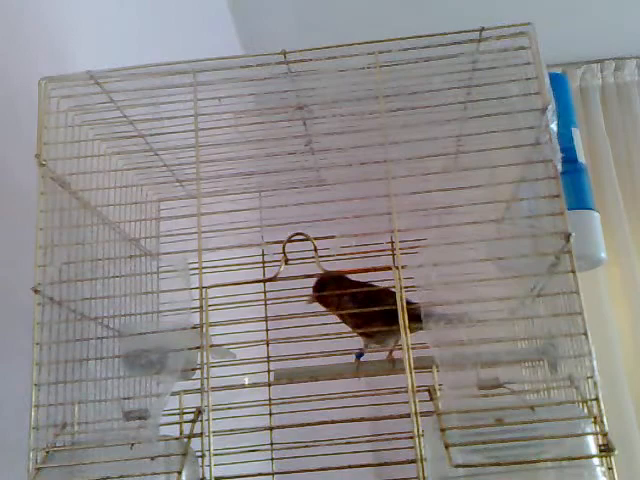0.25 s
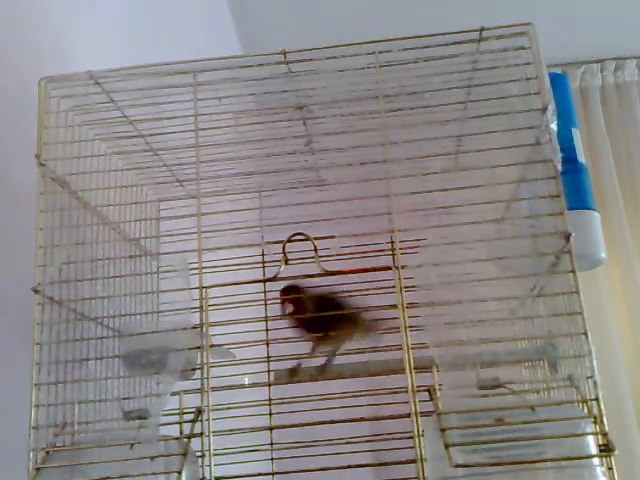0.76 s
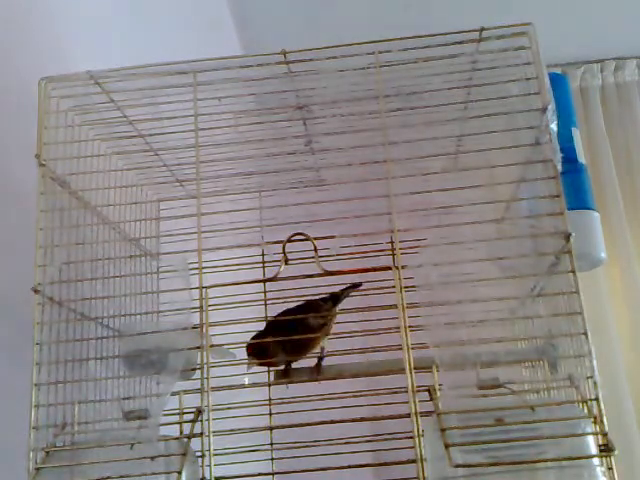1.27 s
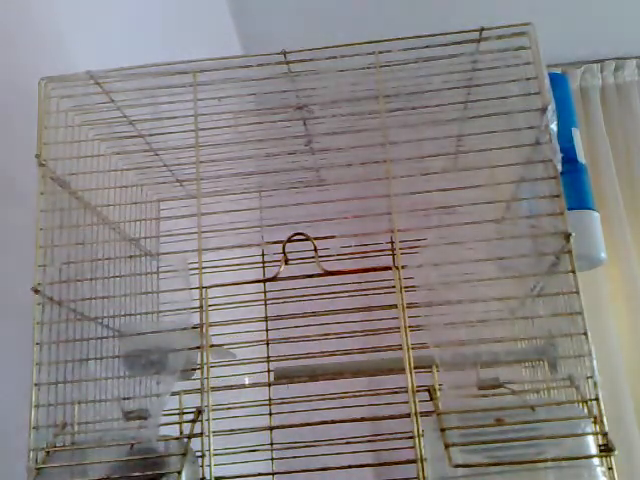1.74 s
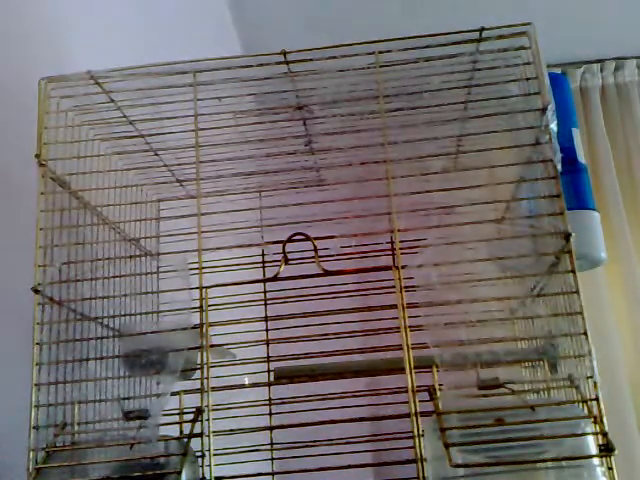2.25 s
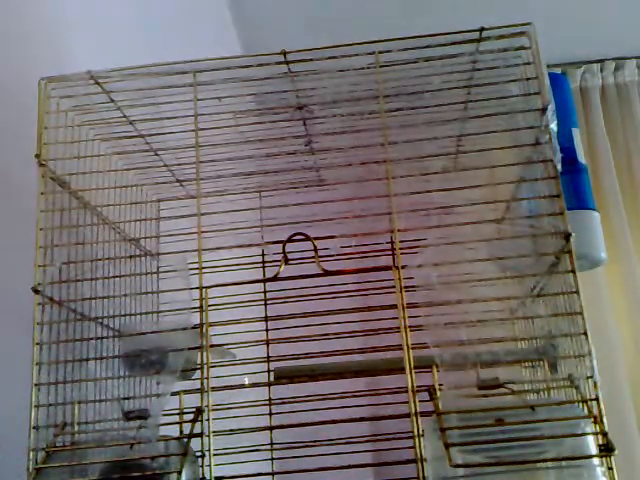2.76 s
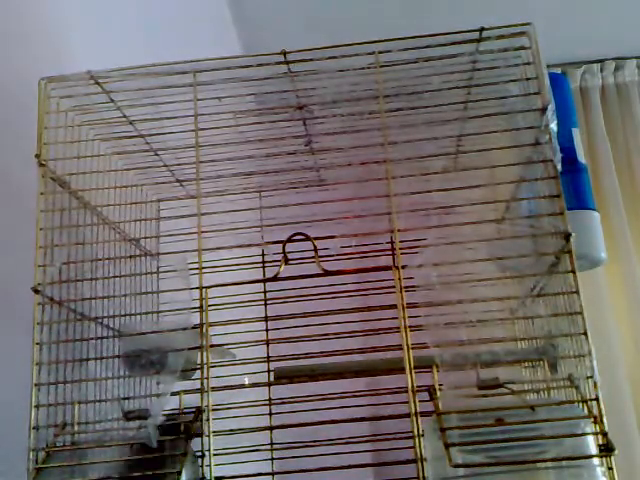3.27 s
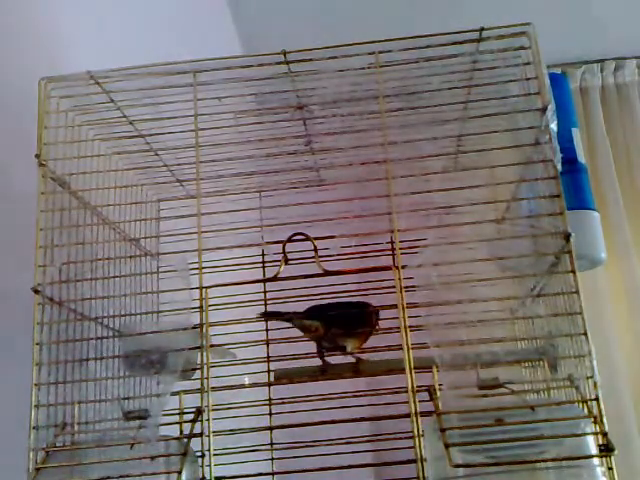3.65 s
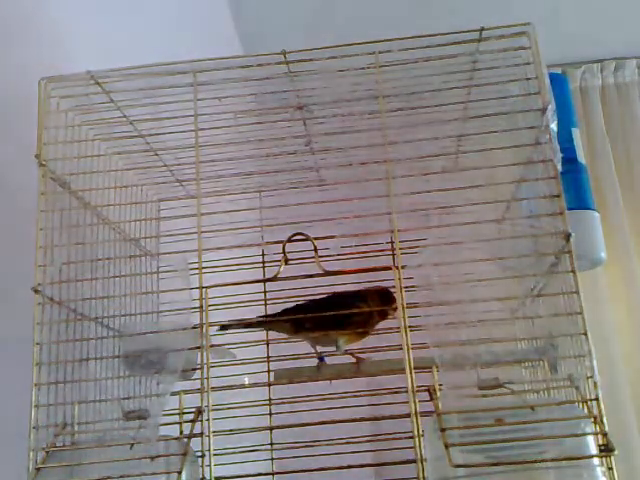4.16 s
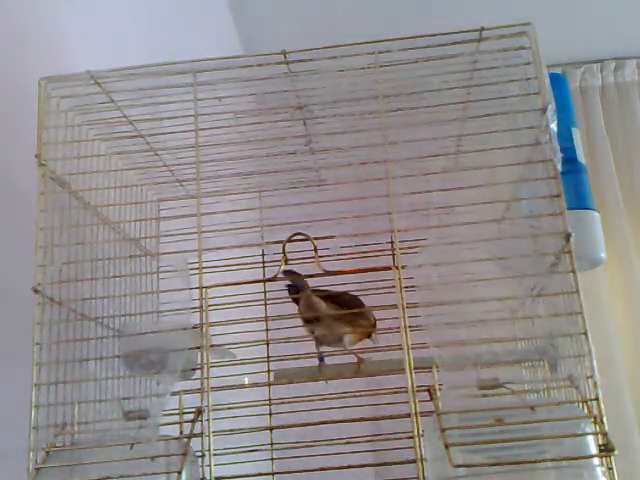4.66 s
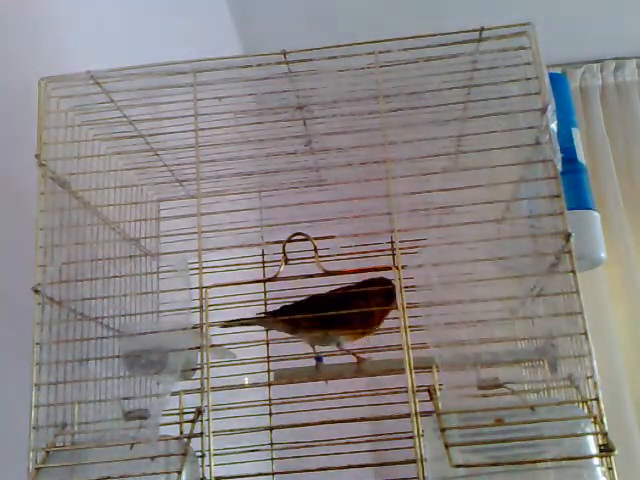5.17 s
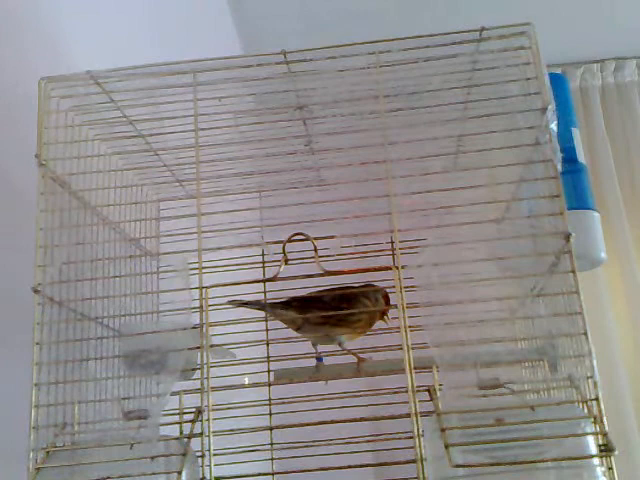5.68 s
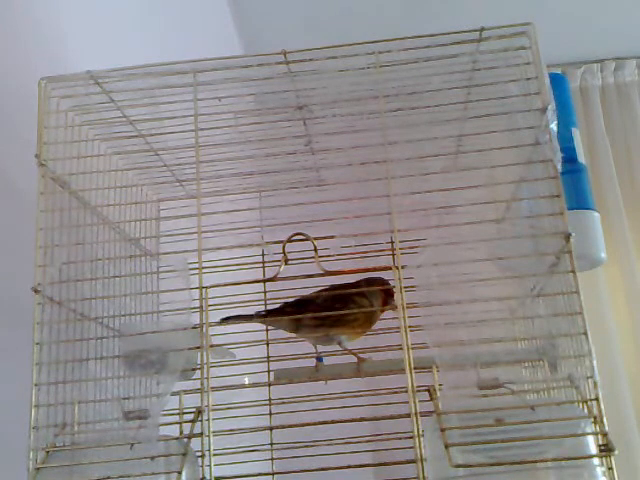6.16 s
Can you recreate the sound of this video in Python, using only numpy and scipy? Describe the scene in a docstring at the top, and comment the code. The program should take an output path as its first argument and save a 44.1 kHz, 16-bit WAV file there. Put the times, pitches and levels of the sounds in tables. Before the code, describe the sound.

The faint echo of an earlier bird phrase dies away at the very start. At about 0.1 s a finch gives a harsh, buzzing chirp that rises quickly, snaps into piercing whistles around 0.17-0.3 s and slides downward by 0.35 s, with a slight overload crackle. Quiet follows over low house rumble and thin hiss. Faint taps come at 0.85-0.9 s, with a soft thud. At 1.63 s a hard double landing clacks on the tray, which rocks briefly to rest. Light claw ticks follow at 2.1-2.2 s and 2.6-2.9 s, then brighter wire rattles at 3.3 s and taps to 3.6 s. Muffled thuds bump between 3.6 and 4.8 s. At 5.35 s a second phrase comes: breathy rasp, quick high whistles, and a falling glide ending near 5.6 s. One tiny peck sounds at 6.2 s. The room is small, with short reflections.

```python
"""A caged finch sings two short phrases: a rising rasp of two beating membranes, then near-sine whistles from
both sides of its syrinx, with sharp clicks at the loudest notes. Between and after them, clicks strike damped
modes of the tray and wires as it hops and pecks; low thuds come through the stand. A small quiet room answers
with decaying noise, over shaped-noise rumble. A small microphone adds hiss, slow gain control and distortion; a
treble noise follows loudness."""
import sys
import numpy as np
from scipy import signal
from scipy.fft import rfft, irfft, next_fast_len
from scipy.io import wavfile
from scipy.ndimage import uniform_filter1d

SR = 44100
rng = np.random.default_rng(int(sys.argv[2]) if len(sys.argv) > 2 else 0)


def master(y):
    """Save y as 16-bit WAV."""
    cut = np.clip(np.atleast_2d(y).T, -1, 1)
    pcm = np.round(cut * 32767)  # scale
    wavfile.write(sys.argv[1], SR, pcm.astype(np.int16))


def magnitude_from_level(level_db):
    """Linear magnitude for a level in decibels (20 dB per decade)."""
    exponent = np.asarray(level_db, float) / 20
    return 10 ** exponent


N = 283058

# Rasps. Each row: start in seconds, middle of the pitch rise in seconds, width of the rise in seconds, loudest
# moment in seconds, peak in dB, swell in dB per second, fade in seconds, beat of the second membrane in Hz.
RASPS = [(.074, .118, .011, 0.15, -10.5, 300.5, .012, 688.8),
         (5.345, 5.365, .013, 5.398, -15.5, 170, 0.074, 628)]
# Throat and beak, one list per rasp. Each row: frequency in Hz, gain in dB.
THROAT_GAINS = [
    [(530, -73.5), (900, -44), (1330, -28.5), (1550, -27), (2000, -28.5), (2750, -23), (3030, -11.5),
     (3740, -7), (4060, -10.5), (5140, -5.5), (6980, -21.5), (7670, -26.5), (15000, -28.5)],
    [(530, -78), (900, -51), (1420, -22), (1570, -19.5), (1890, -26.5), (2030, -22), (3700, -9),
     (4210, -13), (5650, -4.5), (6430, -14.5), (6980, -2), (8530, -23), (15000, -28)],
]
# Harmonics 1-7, one row per rasp: strengths in dB.
HARMONICS_DB = [(1.5, 4, -0.5, -5, -7, -12.5, -13.5), (4, 5.2, 4, 5, -7.5, -10, -16.5)]
# Roughness, one row per rasp: pitch jitter as a share, breath against tone as a ratio.
HOARSENESS = [(.011, .5), (.019, .9)]
RASP_LOW_HZ, RASP_HIGH_HZ = 1247, 1905   # the fundamental rises in an S between these
RASP_ATTACK_S, SILENT_DB = 0.012, -51.5

# Held notes. Each row: start in seconds, length in seconds, entry pitch in Hz, held pitch in Hz before sag,
# first level in dB, last level in dB.
HELD_NOTES = [(0.165, .013, 5600, 6540, -15.5, -21), (.178, .009, 6500, 6200, -24, -19),
              (.177, .011, 3000, 3150, -32, -32), (.1865, .0175, 7800, 5220, -7, -2.5),
              (.205, 0.034, 5200, 5200, -17, -29), (.226, .03, 5600, 5740, -22, -33),
              (.26, .038, 5750, 5780, -19, -21), (5.4385, .006, 5500, 5150, -14, -14),
              (5.458, .006, 5400, 5100, -20, -19), (5.449, .015, 3600, 3640, -20, -21)]
SETTLE_S, SAG_PER_S = 0.0012, 0.6   # time constant of the entry; share of pitch lost per second
EDGE_S, EDGE_DB = 0.0034, 28.5   # soft ends
# Falling glides. Each row: start in seconds, length in seconds, top in Hz, bottom in Hz, bend (1 = straight),
# pitch where it swells in Hz, level in dB.
GLIDES = [(0.226, .12, 5200, 2150, 1.25, 4270, -13), (5.485, .098, 5257, 2200, .92, 4350, -11)]
# Loudness along a glide's fall. Each row: pitch in Hz, level in dB.
GLIDE_STRENGTH = [(2150, -38), (2550, -20), (2950, -7), (3400, 0), (4100, -3), (5000, -5), (5300, -18)]
HUSH_DB, SWELL_WIDTH_HZ = 15, 60   # a glide is softer before its swell
# Two notes slurred together. Each row: time in seconds, pitch in Hz, level in dB.
SLUR = [(5.464, 6890, -35), (5.475, 6800, -17), (5.483, 6776, -14), (5.49, 6640, -36.5), (5.5, 6158, -31.5),
        (5.508, 5920, -10), (5.526, 5836, -13), (5.537, 5800, -50)]
# Sharp clicks at and during loud whistles. Each row: time in seconds, level in dB.
ONSET_CLICKS = [(.1915, -8.5), (.197, -18), (5.512, -24), (5.524, -24), (5.54, -20)]
OCTAVE_DB = -35

# Claw landings. Each row: time in seconds, tray level in dB, wires level in dB.
HOPS = [(0.917, -52, -64), (1.633, -23, -42.5), (1.65, -30.5, -51), (2.081, -49, -64),
        (2.104, -47.5, -73.5), (2.157, -38.5, -59), (2.182, -50, -65), (2.688, -55.5, -61.5),
        (2.919, -62.5, -63.5), (3.275, -37.5, -38.5), (3.286, -47.5, -38), (3.399, -52, -63),
        (3.441, -37.5, -51.5), (3.459, -40.5, -53.5), (3.579, -48, -64.5)]
# Single pecks at a wire. Each row: time in seconds, tray level in dB, wires level in dB, tick level in dB.
PECKS = [(0.841, -67.5, -52, -72), (2.606, -54, -65, -43), (2.869, -44.5, -51.5, -59),
         (3.936, -59, -55.5, -63.5), (6.189, -64.5, -58, -70)]
# Tray modes. Each row: frequency in Hz, level in dB, T60 in seconds.
TRAY_MODES = [(424, -11, 0.022), (612.5, -9, 0.024), (744, -1, 0.025), (873, -4, 0.028), (1049, -1.5, 0.03),
              (1230, 0, 0.027), (1630, -15.5, 0.033), (1930, -19, 0.0096)]
# Wire modes. Each row: frequency in Hz, level in dB, T60 in seconds.
WIRE_MODES = [(2300, 6.5, 0.006), (2940, -8, 0.019), (3227, -6, 0.0087), (3960, -5.5, 0.012),
              (3980, -17, 0.0035), (4820, -2.5, 0.011), (5200, -1, 0.0078)]
FLURRY_S, PECK_S, FLURRY_SWELL = 0.012, 0.0033, 2.4   # click spans; build-up against the fade
CLAW_DB, CLAW_FOLLOWS = -64, 0.52   # claw tick, and how far it follows the wires
# After the hardest landing the tray rocks to rest.
ROCK_S, ROCK_GAP_S, ROCK_DB, ROCK_LOSS_DB, ROCK_WIRES_DB = 1.709, 0.041, -44.5, 4, -24
# Dull thuds through the stand. Each row: time in seconds, push level in dB, mode in Hz.
THUDS = [(0.914, -43.5, 241), (1.252, -45, 233), (1.627, -41, 181), (3.621, -45.5, 222), (3.944, -46, 237),
         (4.419, -36, 214), (4.551, -37.5, 251), (4.784, -49, 235)]

# Earlier phrase dying away. Single row: low edge in Hz, high edge in Hz, level in dB, T60 in seconds.
FADING_BAND = (3400, 6200, -31, 0.17)
LAST_NOTE_HZ, LAST_NOTE_DB = 5600, 1.5   # where the dying phrase is strongest
ROOM_T60_S, TREBLE_T60_S, ROOM_DB = 0.15, 0.085, -4.5
# House rumble. Each row: time in seconds, mean level in dB.
RUMBLE_LEVEL = [(0.0, -51.5), (1.3, -50), (4.11, -51.5), (4.83, -48), (5.13, -52), (6.4, -50), (6.42, -52)]
# Rumble spectrum. Each row: frequency in Hz, density in dB per Hz.
RUMBLE_SPECTRUM = [(13, -39.5), (22, -12.5), (35, -3), (54, 4), (64, -2.5), (75, -13), (102, -3),
                   (140, -10), (233, -14), (360, -22), (700, -31), (910, -58), (1540, -120)]
# Microphone hiss spectrum. Each row: frequency in Hz, density in dB per Hz.
HISS_SPECTRUM = [(240, -31), (400, -6), (527, -8.5), (569, -6), (654, -9.5), (786, -7), (1010, -10.5),
                 (1190, -11), (2230, -14), (2410, -12.5), (6440, -20.5), (7750, -15.5), (8900, -16.5),
                 (15000, -13), (15700, -12)]
HISS_DB = -60
MIXING, TOP = 0.14, 0.8   # microphone: square-law share, amplitude ceiling


def rms_one(x):
    """Scale to rms 1."""
    return x / np.sqrt(np.mean(x ** 2) + 1e-20)


def coloured(x, spectrum):
    """Filter x by dB lines straight in log frequency: cut below the first point, last gain held above the last."""
    hz, db = np.transpose(spectrum)
    size = next_fast_len(len(x))
    grid_hz = np.maximum(np.arange(size // 2 + 1) * SR / size, 1)
    gain_db = np.interp(np.log(grid_hz), np.log(hz), db, left=-90)
    return irfft(rfft(x, size) * magnitude_from_level(gain_db), size)[:len(x)]


def wobble(size, hz):
    """Smooth chance of rms 1: noise through two equal poles at hz."""
    r = np.exp(-2 * np.pi * hz / SR)
    noise = rng.standard_normal(size + 4000)
    return rms_one(signal.lfilter([1], [1, -2 * r, r * r], noise)[4000:])


def note(rows):
    """Sample range of a note and its controls along it."""
    s, *columns = np.transpose(sorted(rows))
    at = np.arange(max(round(s[0] * SR), 0), round(s[-1] * SR))
    return at, [np.interp(at / SR, s, c) for c in columns]


def ring(clicks, hz, t60_s):
    """Damped mode: a unit click starts a sine of height about 1."""
    r, w = magnitude_from_level(-60 / (t60_s * SR)), 2 * np.pi * hz / SR
    return signal.lfilter([0, np.sin(w)], [1, -2 * r * np.cos(w), r * r], clicks + 1e-18)


def rasp_rows(start_s, middle_s, width_s, loudest_s, peak_db, swell_db_s, fade_s, beat_hz):
    """Controls of a rasp: quick attack, steady swell, fade; pitch rises in an S."""
    end_s = loudest_s + fade_s
    s = np.linspace(start_s, end_s, num=60)
    hz = RASP_LOW_HZ + (RASP_HIGH_HZ - RASP_LOW_HZ) / (1 + np.exp((middle_s - s) / width_s))
    voiced_s = start_s + RASP_ATTACK_S
    voiced_db = peak_db - swell_db_s * (loudest_s - voiced_s)
    db = np.interp(s, [start_s, voiced_s, loudest_s, end_s], [SILENT_DB, voiced_db, peak_db, SILENT_DB])
    return list(zip(s, hz, beat_hz + 0 * s, db))


def rasps(beat=1.0, beat_jitter=0.14):
    """One membrane pulses, the other throbs it unevenly into sidebands; breath roughens both."""
    out = np.zeros(N)
    for rows, throat, harmonics_db, (jitter, breath) in zip(RASPS, THROAT_GAINS, HARMONICS_DB, HOARSENESS):
        at, (hz, beat_hz, db) = note(rasp_rows(*rows))
        phase = 2 * np.pi * np.cumsum(hz * (1 + jitter * wobble(len(at), 270))) / SR
        harmonics = [magnitude_from_level(level) * np.cos((k + 1) * phase + k * k) for k, level in enumerate(harmonics_db)]
        tone = rms_one(sum(harmonics))
        beat_phase = 2 * np.pi * np.cumsum(beat_hz * (1 + beat_jitter * wobble(len(at), 200))) / SR
        throb = np.exp(beat * np.cos(beat_phase))
        air = np.diff(rng.standard_normal(len(at) + 1))
        voiced = coloured((tone + breath * air) * throb, throat)
        local_rms = np.sqrt(uniform_filter1d(voiced ** 2, size=500) + 1e-20)
        out[at] += magnitude_from_level(db) * voiced / local_rms   # the level curve alone sets loudness
    return out


def whistle_rows():
    """Controls of the slur, held notes and glides."""
    out = [SLUR]
    for start_s, length_s, entry_hz, held_hz, first_db, last_db in HELD_NOTES:
        t = np.linspace(0, length_s, num=60)
        hz = held_hz * (1 - SAG_PER_S * t) + (entry_hz - held_hz) * np.exp(-t / SETTLE_S)
        edge = np.clip(1 - np.minimum(t, length_s - t) / EDGE_S, 0, 1)
        db = first_db + (last_db - first_db) * t / length_s - EDGE_DB * edge ** 2
        out.append(list(zip(start_s + t, hz, db)))
    for start_s, length_s, top_hz, bottom_hz, bend, swell_hz, level_db in GLIDES:
        s = np.linspace(start_s, start_s + length_s, num=60)
        hz = top_hz + (bottom_hz - top_hz) * np.linspace(0, 1, num=60) ** bend
        hush_db = HUSH_DB / (1 + np.exp((swell_hz - hz) / SWELL_WIDTH_HZ))
        db = level_db - hush_db + np.interp(hz, *np.transpose(GLIDE_STRENGTH))
        out.append(list(zip(s, hz, db)))
    return out


def whistles(jitter=0.0045, octave_growth=0.3, flutter_db=2.2, rough=0.1):
    """Near sines, unsteady in pitch and level; the octave grows more slowly than the note."""
    out = np.zeros(N)
    for rows in whistle_rows():
        at, (hz, db) = note(rows)
        phase = 2 * np.pi * np.cumsum(hz * (1 + jitter * wobble(len(at), 360))) / SR
        db = db + flutter_db * wobble(len(at), 200)
        edges = np.minimum(np.minimum(at - at[0], at[-1] - at) / 150, 1)
        presence = np.clip((hz - 3200) / 1200, 0, 1) * edges   # low notes lose their octave
        octave_db = OCTAVE_DB + octave_growth * db + 0.84 * wobble(len(at), 120)
        octave = magnitude_from_level(octave_db) * presence * np.sin(2 * phase)
        tone = magnitude_from_level(db) * (1 + rough * wobble(len(at), 500)) * np.sin(phase)
        out[at] += np.sqrt(2) * (tone + octave)
    # the whistles carry nothing below about 2 kHz
    return signal.sosfilt(signal.butter(6, 2100, "high", fs=SR, output="sos"), out)


def onset_clicks():
    """Sharp clicks at loud whistles: single impulses through a gentle band-pass."""
    clicks = np.zeros(N)
    for s, db in ONSET_CLICKS:
        clicks[round(s * SR)] = magnitude_from_level(db)
    return signal.sosfilt(signal.butter(1, [300, 3500], "band", fs=SR, output="sos"), clicks)


def touch_rows():
    """Every contact as (s, tray dB, wires dB, tick dB, span s)."""
    rocks = []
    for k in range(4):
        rocks.append((ROCK_S + k * ROCK_GAP_S, ROCK_DB - k * ROCK_LOSS_DB, ROCK_DB + ROCK_WIRES_DB))
    landings = []
    for s, tray_db, wires_db in HOPS + rocks:
        tick_db = CLAW_DB + CLAW_FOLLOWS * (wires_db - CLAW_DB)
        landings.append((s, tray_db, wires_db, tick_db, FLURRY_S))
    return landings + [(*peck, PECK_S) for peck in PECKS]


def flurries(touches, column, uneven_db=2.5, clicks_per_s=3500):
    """Random clicks of every contact under a fading envelope, scaled by one level column."""
    since_s = np.arange(3000) / SR
    clicks = np.zeros(N + len(since_s))
    shape = (len(touches), len(since_s))
    grains = rng.standard_normal(shape) * (rng.random(shape) < clicks_per_s / SR)
    grains[:, 0] = 0.51   # first contact
    for touch, flurry, luck in zip(touches, grains, rng.standard_normal(len(touches))):
        at = round(touch[0] * SR)
        age = since_s / touch[4]
        envelope = (1 + FLURRY_SWELL * age) * np.exp(-2 * age)
        clicks[at:at + len(since_s)] += magnitude_from_level(touch[column] + uneven_db * luck) * flurry * envelope
    return clicks[:N]


def hops(tray_db=-15, wires_db=-9, claw_db=6.5):
    """Hops and pecks: click flurries give a dry tick and strike the modes of tray and wires unevenly."""
    touches = touch_rows()
    tray = sum(magnitude_from_level(db + tray_db) * ring(flurries(touches, 1), hz, t60_s) for hz, db, t60_s in TRAY_MODES)
    wires = sum(magnitude_from_level(db + wires_db) * ring(flurries(touches, 2), hz, t60_s) for hz, db, t60_s in WIRE_MODES)
    ticks = sum(flurries(touches, 3) for _ in range(3))
    tick_band = signal.butter(2, [5500, 11000], "band", fs=SR, output="sos")
    return tray + wires + magnitude_from_level(claw_db) * signal.sosfilt(tick_band, ticks)


def thuds(t60_s=0.16):
    """Each thud is a soft push into one low, quickly damped mode."""
    out = np.zeros(N)
    for s, db, hz in THUDS:
        click = np.zeros(N)
        click[round(s * SR)] = magnitude_from_level(db)
        out += ring(click, hz, t60_s)
    return signal.lfilter([0.04], [1, -0.96], out)


def fading_phrase():
    """Echoes of earlier notes: decaying noise over the whistle range, plus a resonance at the last note."""
    low_hz, high_hz, db, t60_s = FADING_BAND
    noise = rng.standard_normal((2, N))
    band = signal.butter(5, [low_hz, high_hz], "band", fs=SR, output="sos")
    wide = rms_one(signal.sosfilt(band, noise[0]))
    last = magnitude_from_level(LAST_NOTE_DB) * rms_one(ring(noise[1], LAST_NOTE_HZ, 0.006023))
    return (wide + last) * magnitude_from_level(db - 60 * np.arange(N) / SR / t60_s)


def room(x, gap_s=0.0051, split_hz=4800):
    """Dense reflections as decaying noise; the treble dies first."""
    t = np.arange(round(0.4 * SR)) / SR
    noise = rng.standard_normal(len(t)) * (t > gap_s)
    low = signal.sosfiltfilt(signal.butter(12, split_hz, fs=SR, output="sos"), noise)
    high = noise - low
    tail = low * magnitude_from_level(-60 * t / ROOM_T60_S) + high * magnitude_from_level(-60 * t / TREBLE_T60_S + 2.0)
    return magnitude_from_level(ROOM_DB) * signal.fftconvolve(x, tail / np.sqrt(np.sum(tail ** 2)))[:N]


def house_rumble():
    """Low shaped noise with a slowly wandering level."""
    s, db = np.transpose(RUMBLE_LEVEL)
    level_db = np.interp(np.arange(N) / SR, s, db) + 0.69 * wobble(N, 2)
    return magnitude_from_level(level_db) * rms_one(coloured(rng.standard_normal(N), RUMBLE_SPECTRUM))


def microphone_hiss():
    """Shaped noise, plus a faint ringing of the microphone port."""
    hiss = magnitude_from_level(HISS_DB) * rms_one(coloured(rng.standard_normal(N), HISS_SPECTRUM))
    port = rms_one(ring(rng.standard_normal(N), 7750, 0.022))
    return hiss + magnitude_from_level(HISS_DB - 17.0) * port


def scene():
    """Bird and cage in the room over rumble and hiss."""
    rasp, whistle, cage = rasps(), whistles() + onset_clicks(), hops()
    direct = rasp + whistle + cage
    reflected = room(0.45 * rasp + whistle + 0.48 * cage)
    background = fading_phrase() + thuds() + house_rumble() + microphone_hiss()
    return (direct + reflected + background)[None]


def gain_control(x, start_db=-1.5, knee_db=-40, ratio=0.65, release_db_s=40, down_db_s=9, up_db_s=19):
    """Gain creeps at limited rates towards an aim set by a slowly released peak level."""
    step = 441   # samples
    level_db = 10 * np.log10(uniform_filter1d(x ** 2, size=step)[::step] + 1e-12)
    fall_db = release_db_s * np.arange(len(level_db)) * step / SR
    held_db = np.maximum.accumulate(level_db + fall_db) - fall_db
    gain_db = [start_db]
    for aim_db in -ratio * np.maximum(held_db - knee_db, 0):
        change_db = np.clip(aim_db - gain_db[-1], -down_db_s * step / SR, up_db_s * step / SR)
        gain_db.append(gain_db[-1] + change_db)
    return magnitude_from_level(np.interp(np.arange(len(x)), step * np.arange(len(gain_db)), gain_db))


def treble_noise(x, level_db=-33, growth=0.6, low_hz=6500):
    """A treble noise follows the loudness of x above a threshold."""
    loudness = np.maximum(np.sqrt(uniform_filter1d(x ** 2, size=300) + 1e-12) - 0.012, 0)
    noise = magnitude_from_level(level_db) * loudness ** growth * rng.standard_normal(x.shape)
    return signal.sosfilt(signal.butter(2, low_hz, "high", fs=SR, output="sos"), noise)


def distortion(x):
    """Loud tones mix by a square law and flatten at the peaks; steep top cut."""
    x = x + MIXING * signal.sosfilt(signal.butter(4, 6500, "high", fs=SR, output="sos"), x ** 2)
    x = x / (1 + (x / TOP) ** 6) ** (1 / 6)
    return signal.sosfilt(signal.cheby2(20, 50, 16250, fs=SR, output="sos"), x)


def band_limit(x):
    """A steep low-pass at the top of the band."""
    return signal.sosfilt(signal.butter(12, 15900, fs=SR, output="sos"), x)


def record(dry):
    """Gain control acts above the bass; then treble noise and distortion."""
    bass = signal.sosfiltfilt(signal.butter(1, 250, fs=SR, output="sos"), dry)
    levelled = bass + (dry - bass) * gain_control(dry[0])
    mix = distortion(levelled + treble_noise(levelled))
    return band_limit(mix)


dry = scene()
out = record(dry)
master(out)
```